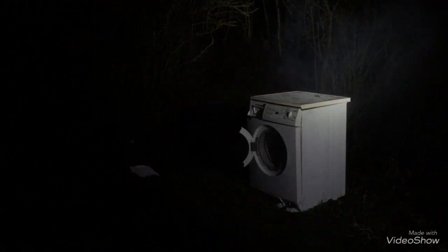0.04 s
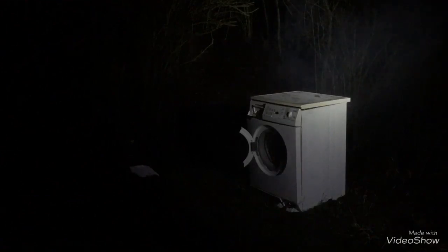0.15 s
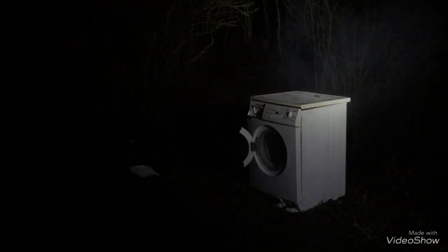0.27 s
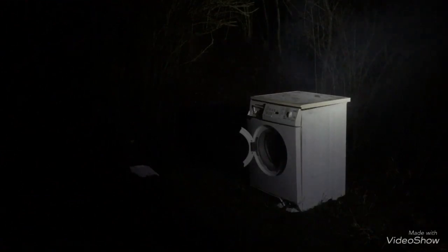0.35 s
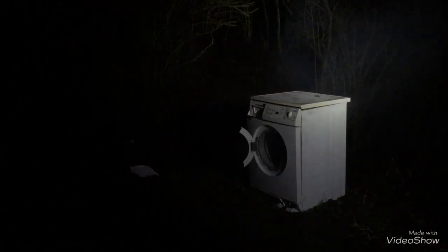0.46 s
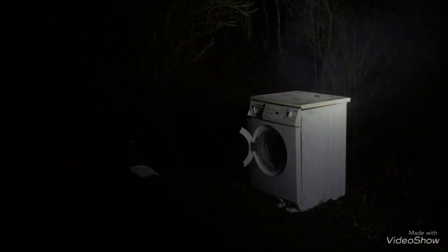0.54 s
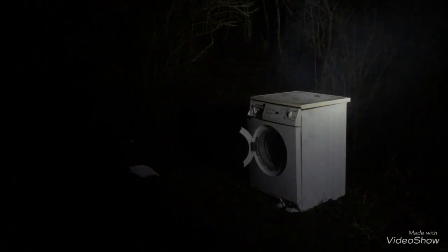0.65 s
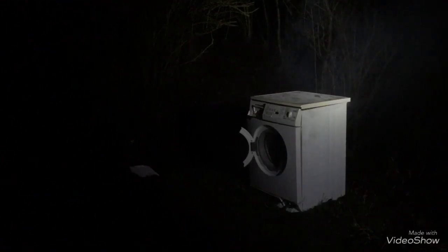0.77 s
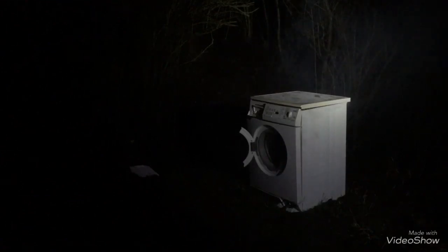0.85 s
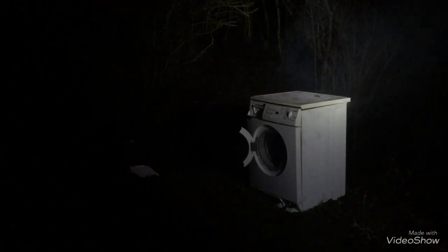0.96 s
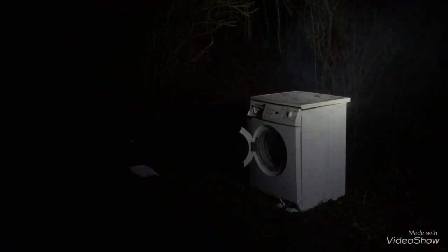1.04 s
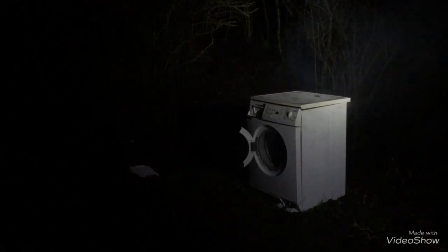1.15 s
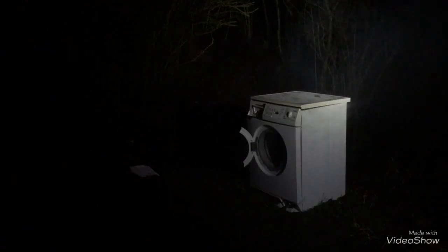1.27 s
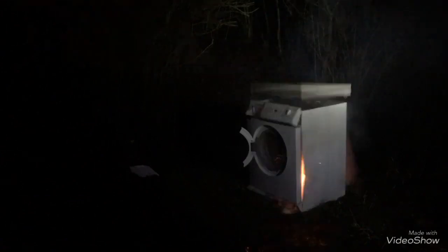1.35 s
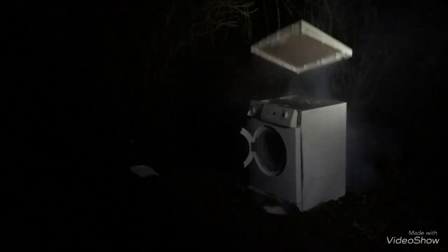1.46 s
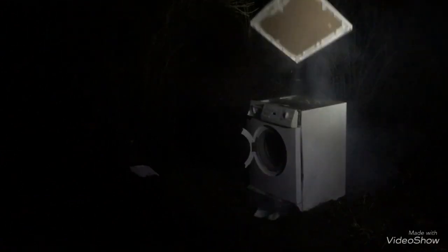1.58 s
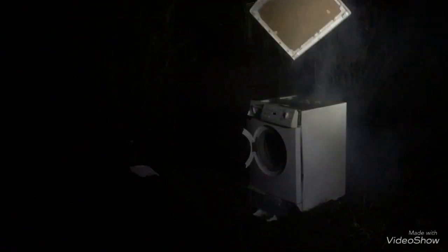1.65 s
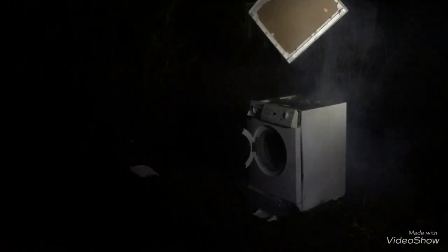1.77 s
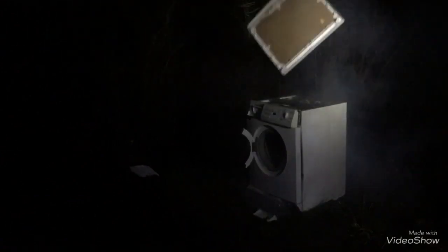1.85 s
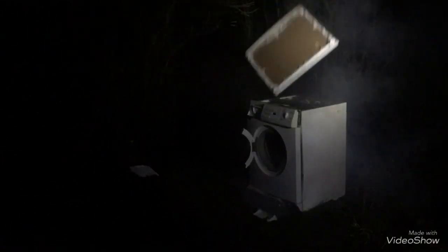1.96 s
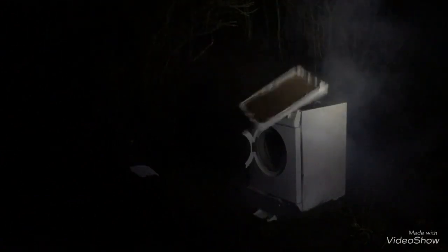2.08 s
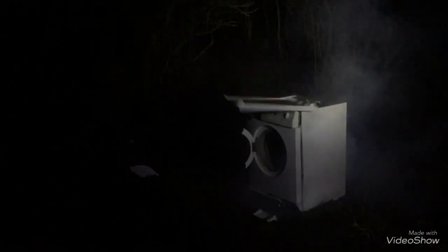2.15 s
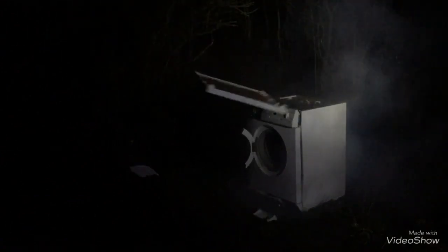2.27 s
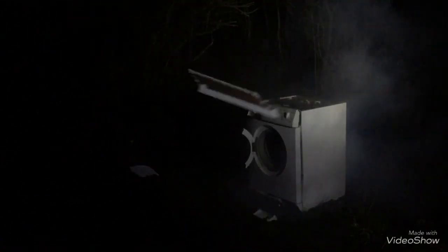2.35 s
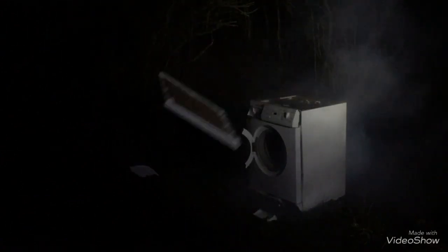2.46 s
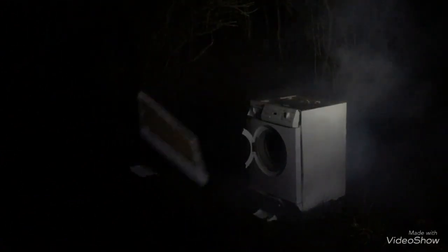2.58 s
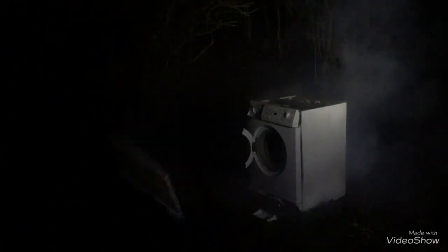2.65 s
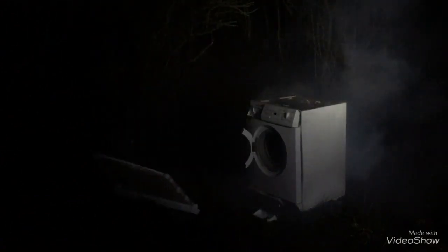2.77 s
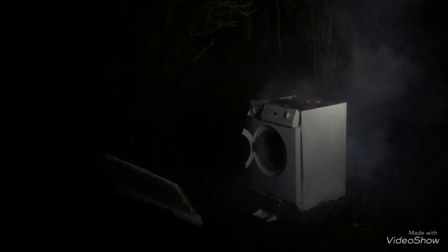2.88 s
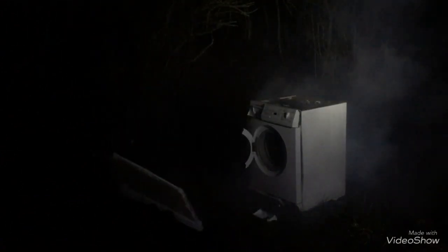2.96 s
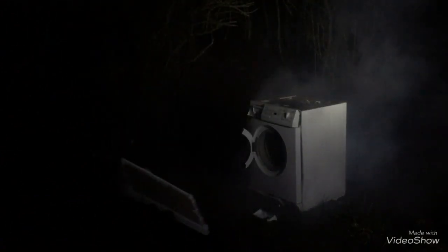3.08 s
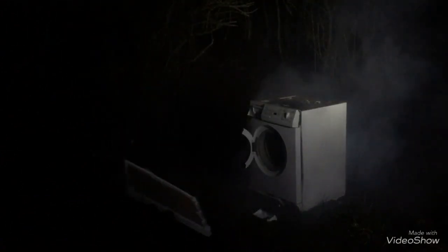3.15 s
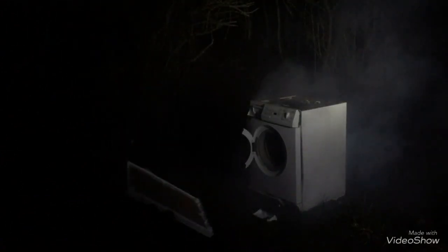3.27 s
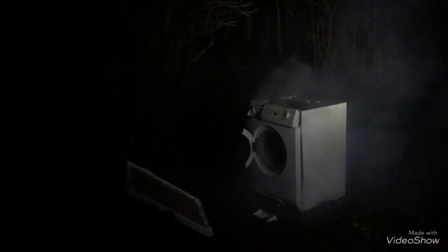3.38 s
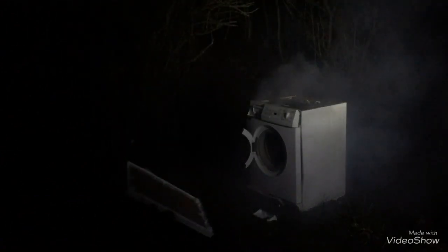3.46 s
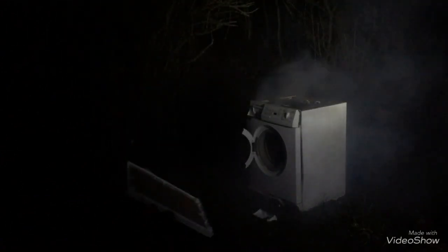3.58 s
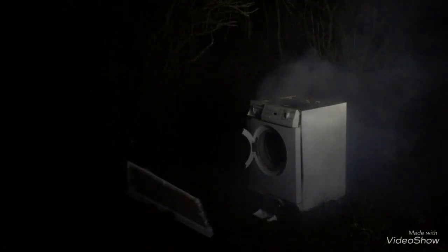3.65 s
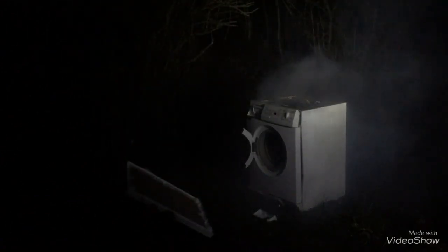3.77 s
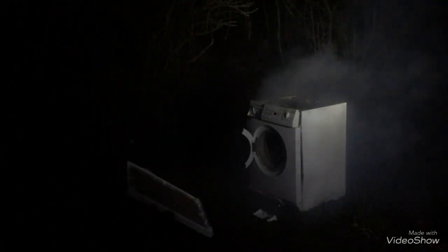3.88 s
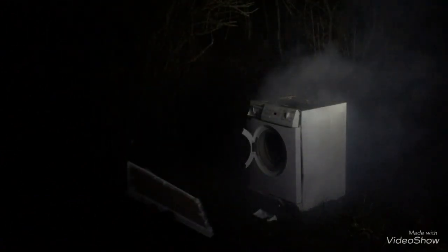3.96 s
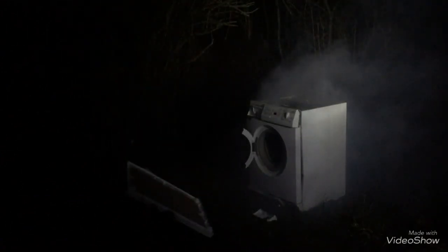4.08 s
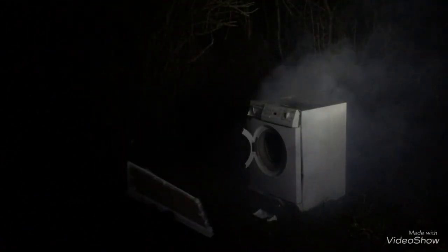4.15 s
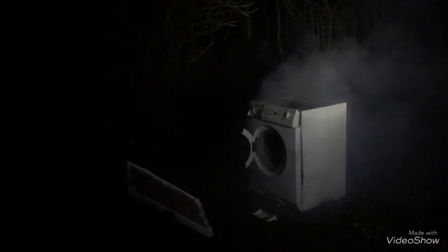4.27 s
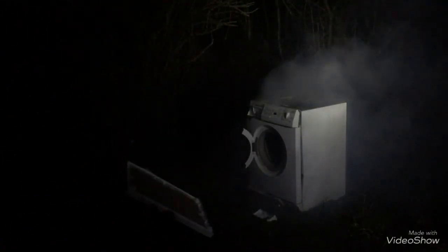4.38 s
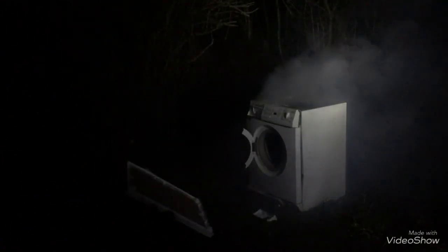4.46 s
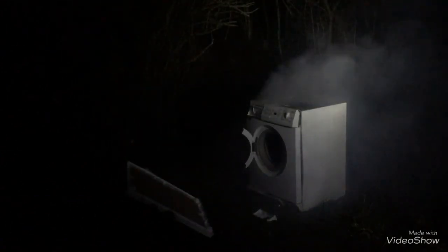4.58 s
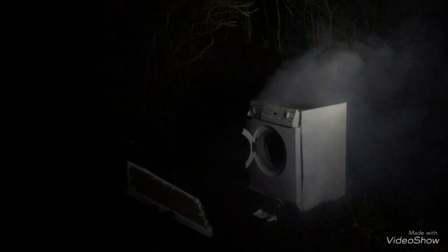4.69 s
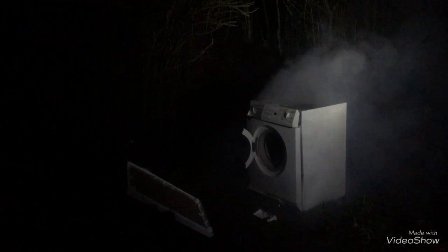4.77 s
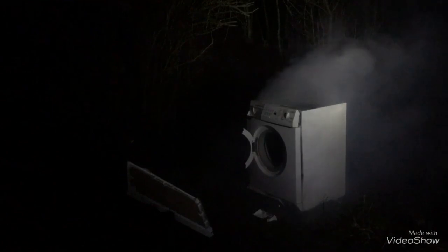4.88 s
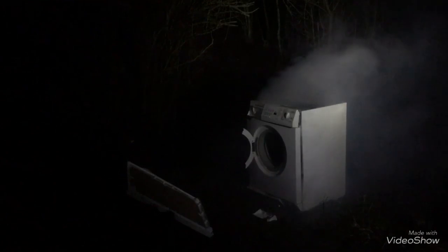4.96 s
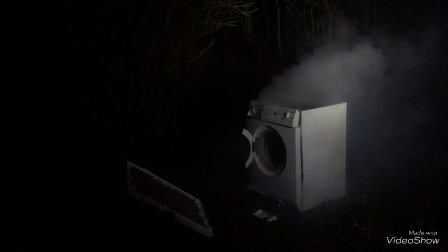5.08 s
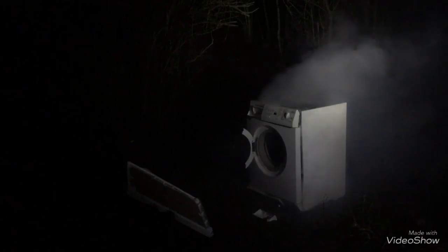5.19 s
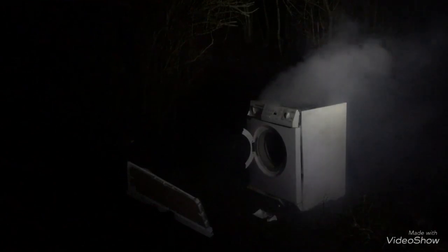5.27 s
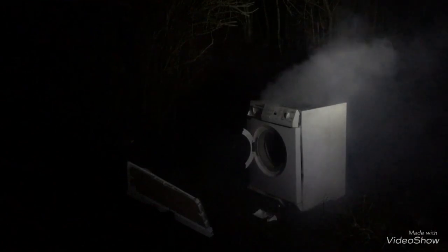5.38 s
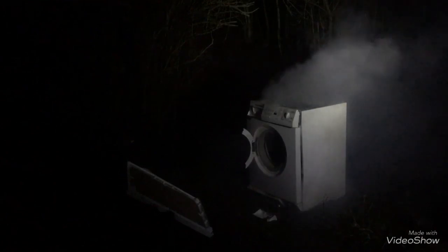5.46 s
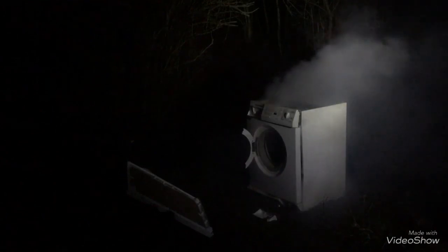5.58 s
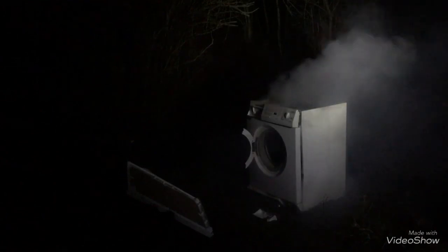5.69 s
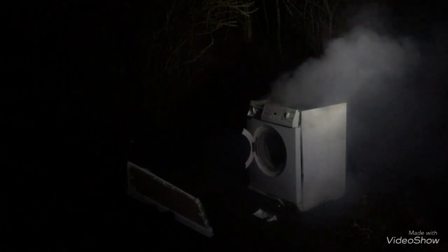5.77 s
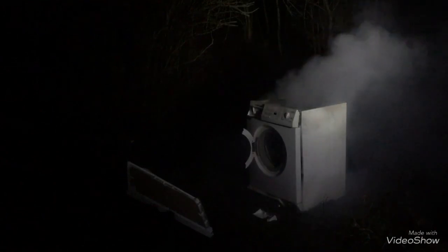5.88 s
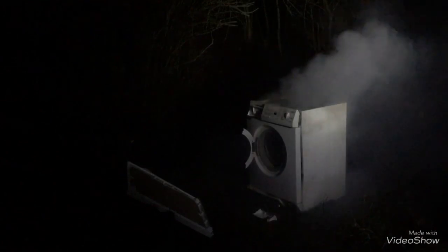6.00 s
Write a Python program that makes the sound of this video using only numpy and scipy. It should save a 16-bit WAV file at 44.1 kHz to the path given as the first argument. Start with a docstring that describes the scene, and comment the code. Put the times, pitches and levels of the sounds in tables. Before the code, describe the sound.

Quiet night air, then a sharp metallic bang with a boom and woodland echo, a thrown steel panel crashing down, and later a far rumbling firework.

```python
"""A firecracker goes off inside a washing machine at the edge of a wood at night: noise bursts make the
slams, fading sine waves the boom, and a noise surge the gas jet. A fuse-like noise fizz comes first.
The thrown top panel clatters on the cabinet and the ground, walls hum, and ticks, knocks and thuds sound.
The wood echoes blast and clatter. Later a far firework thumps and rolls over the land as fading noise.
Faint rustling and night air, both filtered noise, lie underneath."""
import sys
import numpy as np
from scipy import signal
from scipy.io import wavfile

SR = 44100
rng = np.random.default_rng(int(sys.argv[2]) if len(sys.argv) > 2 else 0)


def log_audio(samples):
    """Write samples as a 16-bit WAV file to the path given in sys.argv[1]."""
    # one column per channel
    frames = np.atleast_2d(samples).T
    # limit to full scale, then quantise
    limited = np.clip(frames, -1, 1)
    pcm = np.round(limited * 32767).astype(np.int16)
    wavfile.write(sys.argv[1], SR, pcm)


N = 266055
TIME = np.arange(N) / SR
# Noise is split into 26 bands, evenly spaced in pitch
EDGES = np.geomspace(22, 17000, 27)
CENTRES = np.sqrt(EDGES[1:] * EDGES[:-1])

# In the tables, t60_s is the time to fade by 60 dB; for noise bursts it holds at 2000 Hz.
# Noise colours only set a balance: each is scaled to total power 1, or its echo is scaled as a whole.

# Night air, balance of the noise: pitch_hz, level_db (per Hz)
NIGHT_COLOUR = [(12, -43), (20, -19.5), (59, 6), (107, -8), (137, -9.5), (496, -17.5), (603, -11),
                (942, -20), (1280, -23), (2370, -29), (2650, -44), (3310, -36.5), (4760, -40.5),
                (13000, -43), (15800, -57.5)]
NIGHT_DB = -60

# Rustling bouts in dry undergrowth: start_s, length_s, level_db
RUSTLES = [(-.07, 0.061, -62.5), (0.632, 0.058, -72.5), (2.566, 0.74, -63), (3.614, 0.42, -63),
           (4.046, 0.46, -74), (5.626, 0.12, -64), (5.965, .1, -59)]
# Balance of the leaf noise: pitch_hz, level_db (per Hz)
RUSTLE_COLOUR = [(50, -21.5), (500, 6.5), (1500, 3.5), (3000, -4.5), (6000, -13.5), (16000, -19.5)]
RUSTLE_ATTACK_S, RUSTLE_FALL_DB_PER_S = 0.052, 61.5

FAR_BANG_S = 4.509
# Firework sound coming back from ever more distant land:
# delay_s, level_db, rise_db_per_s, fall_db_per_s
LAND_RETURNS = [(.07, -40, 26, 112), (.42, -45, 14, 34), (1.15, -55, 1, 20.5)]
# Balance of the rolling noise: pitch_hz, level_db (per Hz)
ROLL_COLOUR = [(24, -25.5), (40, -9.5), (90, -5), (213, -19), (335, -8), (446, -12), (1130, -10.5),
               (1270, -10), (2540, -17), (4200, -30), (7630, -53.5), (12000, -81), (15600, -88),
               (22000, -120)]
# Balance of the first low rumble: pitch_hz, level_db (per Hz)
RUMBLE_COLOUR = [(25, -4), (85, 11.5), (280, 4.5), (600, -39.0), (2000, -33), (16000, -82)]
# Ringing tones of the far bang: pitch_hz, level_db, t60_s
FAR_TONES = [(40.8, -40, 0.37), (84, -29, 0.28), (174.5, -34, 0.4), (328.6, -43, 0.38)]
# Single reports within the roll: start_s, level_db
FAR_REPORTS = [(4.508, -42.5), (4.534, -45), (4.562, -42.5), (4.717, -41.5), (4.784, -39), (4.925, -38)]
# Brightness at the far bang in dB per octave, and how much of it each second of delay takes away
REPORT_T60_S, REPORT_TILT_DB, REPORT_DULLING_DB_PER_S = 0.093, 6.5, 21
# Deep thumps from far off: start_s, level_db
FAR_THUMPS = [(4.843, -38), (5.234, -43.5), (5.944, -47.5)]
THUMP_HZ, THUMP_T60_S = 80.1, 0.085

# Answers of the ground, the first trunks and the depth of the wood:
# delay_s, level_db (relative), rise_db_per_s, fall_db_per_s
WOOD_RETURNS = [(.015, -2.5, 1500, 135), (.23, -2.5, 331, 74.5), (.4, -20, 60, 27.5)]
# Balance of the echo: pitch_hz, level_db (relative)
WOODS_COLOUR = [(22, -18), (50, -5.5), (92, 5), (170, -8.5), (500, -8.5), (950, -5.5), (1400, 2),
                (3000, -2.5), (6000, -10.5), (15000, -23.5)]
WOODS_LENGTH_S = 1.5
# The ground slope throws the low boom back in one piece
SLOPE_DELAY_S, SLOPE_DB, SLOPE_CUT_HZ = .226, -24, 120

# Small crackling ticks close by: start_s, level_db, t60_s
TICKS = [(1.272, -60.5, .03), (1.741, -47.5, 0.066), (1.7589, -40.5, 0.11), (1.956, -58, .17),
         (2.066, -63, .14), (2.081, -56, 0.16), (2.991, -51, 0.13), (3.0677, -48, 0.028),
         (3.159, -52.5, 0.074), (3.1787, -53, 0.15), (4.182, -61, 0.0302), (5.2308, -59.5, 0.19),
         (5.314, -61.5, 0.23)]
# Balance of the tick noise: pitch_hz, level_db (per Hz)
TICK_COLOUR = [(25, -66), (200, -26), (900, -6), (1800, -1), (3000, -4), (6000, -8.5), (10000, -11.5),
               (16000, -22.5)]
# Light hard knocks: start_s, level_db, pitch_hz
KNOCKS = [(3.068, -57, 1725), (3.160, -50.5, 1620), (3.192, -54, 1930), (3.263, -50, 1877),
          (4.247, -61.5, 1500), (4.2565, -54.5, 1390)]
KNOCK_T60_S = 0.067
# Soft thuds, perhaps steps or handling: start_s, level_db, pitch_hz, t60_s
THUDS = [(.277, -55.5, 515, 0.1), (.447, -48.5, 427, 0.12), (2.884, -44, 550, 0.027),
         (3.111, -36.5, 410, .04), (3.115, -35.5, 140, 0.055), (3.152, -56, 421, 0.36),
         (3.732, -47, 665, 0.15), (5.096, -42.5, 664, 0.06), (5.545, -34.5, 270, 0.08),
         (5.657, -50.5, 318, 0.41), (5.79, -42, 645, 0.067), (5.989, -56, 894, 0.27)]
# Each thud settles with a softer, lower second touch (pitch is a ratio)
SETTLE_S, SETTLE_DB, SETTLE_PITCH = 0.026, -9.5, 0.81

# Side walls set humming: start_s, level_db, brightness_db_per_octave, t60_s
WALL_BLOWS = [(1.481, -41.5, -5.5, 1), (2.223, -45, 2, 0.47), (2.29, -46, 3, 0.47)]
# Clearest tones of the walls: pitch_hz, level_db (relative to the blow), t60_s
WALL_TONES = [(78, -6, 1.6), (95.6, -4, 2.1), (119.4, -8, 2.3), (231, -11.5, 1.2), (250, -11.5, 1.6),
              (680, -22.5, .55), (850, -22.5, 0.45), (1160, -26.5, 1.2)]
# Balance of the wall noise: pitch_hz, level_db (per Hz)
WALL_COLOUR = [(25, -46.5), (55, -15), (85, 2), (125, 0), (175, -10.5), (290, -12), (430, -14.5),
               (800, -14.5), (1400, -24), (4000, -38), (16000, -68.5)]

# The top panel hits the cabinet, then the ground:
# start_s, level_db, brightness_db_per_octave, t60_s
PANEL_HITS = [(2.194, -43.5, 1, 0.098), (2.205, -29.5, -2.5, 0.19), (2.214, -35.5, 3, 0.086),
              (2.225, -31, 4, 0.046), (2.249, -36, -2, 0.17), (2.266, -39, 2, 0.059),
              (2.281, -23, -2.5, 0.073), (2.7349, -37.5, 7, 0.15), (2.785, -27, 1, 0.036),
              (2.7953, -12.5, -0.36, 0.049)]
# Balance of the panel noise: pitch_hz, level_db (per Hz)
PANEL_COLOUR = [(25, -31), (80, -5.5), (230, -2), (450, -9.5), (700, -2), (1000, -3.5), (2000, 0.5),
                (3200, -4.5), (4300, -11.5), (6300, -17.5), (8000, -19.5), (16000, -33.5)]
# Ringing tones of the panel: pitch_hz, level_db (relative to one another), t60_s
PANEL_TONES = [(214, -8, .15), (989, 8.5, 0.02), (1140, -29, 0.18), (1255, -22.5, .06), (1497, -10, 0.077),
               (1640, -19, 0.034), (1954, -0.5, 0.072), (2293, -15.5, 0.17), (3250, 0.5, 0.051)]
# After each hit the loose trim buzzes on, far softer (level relative to the hit, tilt per octave)
BUZZ_LAG_S, BUZZ_DB, BUZZ_TILT_DB, BUZZ_T60_S = .018, -30.5, 4, .27

# Balance of the fizz: pitch_hz, level_db (per Hz)
FUSE_COLOUR = [(500, -31.5), (2000, -5), (8000, 2), (15000, -6)]
FUSE_END_S, FUSE_DB, FUSE_FALL_DB_PER_S = .44, -77, 45.5

# The charge cracks and the cabinet slams outwards:
# start_s, level_db, brightness_db_per_octave, t60_s
SLAMS = [(1.4428, -23, 6, 0.023), (1.4450, -25.5, -2, 0.027), (1.4505, -33, 8.5, 0.035),
         (1.4540, -21.5, -4.5, 0.068), (1.4568, -16.5, -2.5, 0.074), (1.4655, -16.5, 5, 0.049)]
# Balance of the sheet steel noise: pitch_hz, level_db (per Hz)
STEEL_COLOUR = [(30, -34.5), (100, -15.5), (300, -16.5), (550, -2), (750, -7.5), (980, 2), (1280, -18),
                (1800, -9), (2800, -10), (4200, -26.5), (9000, -33.5), (16000, -52.5)]
# Tones of the cabinet booming under the pressure wave: pitch_hz, level_db, t60_s
BOOM_TONES = [(50, -21.5, .14), (85.4, -14, .22), (118.4, -19, 0.23), (190.1, -19, .14), (291, -23.5, .1),
              (367, -22, .14), (543, -19.5, 0.11), (953, -20, 0.097)]
# Each tone starts 1.4 of its own cycles late, so the low ones come last
BOOM_S, BOOM_LAG_CYCLES = 1.4545, 1.4
# Balance of the gas jet noise: pitch_hz, level_db (per Hz)
JET_COLOUR = [(22, -24), (45, -15), (80, -5), (115, -8), (190, -10.5), (340, -16), (500, -21.5),
              (750, -20.5), (920, -21.5), (1270, -21.5), (1550, -20), (5390, -21), (12800, -25),
              (15800, -29.5)]
# The jet grows while the gap under the top opens, then dies as the pressure drops
JET_S, JET_OPENING_S, JET_DB = 1.4648, 0.042, -18.5
JET_RISE_DB_PER_S, JET_FALL_DB_PER_S = 109, 291

CUTOFF_HZ = 15950


def from_db(db):
    """Turn decibels into a gain."""
    return 10 ** (np.asarray(db) / 20)


def at_hz(points, hz):
    """Read a colour table at any pitch, with pitch spaced as we hear it."""
    table_hz, db = np.transpose(points)
    return np.interp(np.log(hz), np.log(table_hz), db)


def noise_bands():
    """Make one row of noise per band, all equally strong; neighbours are unrelated."""
    white = rng.standard_normal((2, N))
    rows = []
    for k in range(len(CENTRES)):
        band_filter = signal.butter(2, EDGES[k:k + 2], "band", fs=SR, output="sos")
        rows.append(signal.sosfilt(band_filter, white[k % 2]))
    rows = np.array(rows)
    return rows / rows.std(axis=1, keepdims=True)


def shares(colour, tilt_db=0):
    """Give each band its share of a total power of 1, tilted by some dB per octave."""
    level_db = at_hz(colour, CENTRES) + tilt_db * np.log2(CENTRES)
    gain = from_db(level_db) * np.sqrt(np.diff(EDGES))  # wider bands hold more power
    return gain / np.linalg.norm(gain)


def flutter(rate, depth_db):
    """Make a gain that wanders at random, with a new target `rate` times a second."""
    knots = np.arange(0, TIME[-1] + 1, 1 / rate)
    return from_db(depth_db * np.interp(TIME, knots, rng.standard_normal(len(knots))))


def surge(age, peak_s, rise_db_per_s, fall_db_per_s):
    """Make a gain that sets in at age 0, grows to 1 at peak_s and dies away."""
    late = age - peak_s
    return (age >= 0) * from_db(np.minimum(rise_db_per_s * late, -fall_db_per_s * late))


def release(s, fall_db_per_s):
    """Make a gain that holds until time s and then fades."""
    return from_db(-fall_db_per_s * np.maximum(TIME - s, 0))


def returns(rows, age):
    """Shape scattered sound: each reflecting region sends back one surge, and their powers add."""
    power = 0
    for delay, db, rise, fall in rows:
        power = power + (from_db(db) * surge(age, delay, rise, fall)) ** 2
    return np.sqrt(power)


def add(out, s, sound):
    """Mix a sound in at time s."""
    start = int(s * SR)
    out[start:start + len(sound)] += sound[:N - start]


def ring(hz, db, t60):
    """Make one fading sine wave, like a single ringing tone of an object."""
    t = TIME[:int(1.5 * t60 * SR)]
    return from_db(db - 60 * t / t60) * np.sin(2 * np.pi * hz * t)


def impacts(rows, colour, bands, low_linger):
    """Each blow wakes a dense crowd of tones, heard as noise; low ones build slower and last longer."""
    out = np.zeros(N)
    for s, db, tilt_db, t60 in rows:
        crowd = bands[:, int(s * SR):int((s + 2 * t60) * SR)]
        t = TIME[:crowd.shape[1]]
        band_t60 = t60 * (CENTRES[:, None] / 2000) ** -low_linger
        build_up = np.minimum(2 * t * CENTRES[:, None], 1)  # half a cycle long
        envelope = from_db(-60 * t / band_t60) * build_up
        add(out, s, from_db(db) * shares(colour, tilt_db) @ (crowd * envelope))
    return out


def bumps(rows, bands, above_db, below_db, tone_db):
    """A damped contact gives one short ringing tone and a puff of noise around its pitch."""
    out = np.zeros(N)
    for s, db, hz, t60 in rows:
        puff_colour = [(hz / 64, -10 * below_db), (hz / 2, -below_db), (hz, 0),
                       (hz * 2, -above_db / 3), (hz * 4, -above_db), (hz * 64, -5 * above_db)]
        out += impacts([(s, db, 0, t60)], puff_colour, bands, low_linger=0.081)
        add(out, s, ring(hz, db + tone_db, t60 / 2))
    return out


def night_air(bands):
    """Soft steady noise with a slightly wandering level stands for the night air."""
    return from_db(NIGHT_DB) * (shares(NIGHT_COLOUR) @ bands) * flutter(rate=26, depth_db=3.33)


def undergrowth(bands):
    """Dry leaves stir in bouts of uneven noise that swell, hold and fade."""
    stir = np.zeros(N)
    for s, length, db in RUSTLES:
        swell = np.clip((TIME - s) / RUSTLE_ATTACK_S, 0, 1)
        stir += from_db(db) * swell * release(s + length, RUSTLE_FALL_DB_PER_S)
    return stir * (shares(RUSTLE_COLOUR) @ bands) * flutter(rate=130, depth_db=3.0)


def far_firework(bands, dulling_db=1.98, first_tilt_db=-0.34):
    """A low thump, then lumpy rolling echoes that grow duller as their paths lengthen."""
    since_bang = TIME - FAR_BANG_S
    dullness = np.clip(since_bang, 0, 1)  # full after one second
    patchy = bands * np.array([flutter(rate=45, depth_db=2) for _ in CENTRES])
    near = shares(ROLL_COLOUR, first_tilt_db) @ patchy
    far = shares(ROLL_COLOUR, first_tilt_db - dulling_db) @ patchy
    roll_gain = returns(LAND_RETURNS, since_bang) * flutter(rate=330, depth_db=1.44)
    out = roll_gain * ((1 - dullness) * near + dullness * far)

    out += impacts([(FAR_BANG_S, -37, 0, .42)], RUMBLE_COLOUR, bands, low_linger=0.079)
    reports = []
    for s, db in FAR_REPORTS:
        tilt_db = REPORT_TILT_DB - REPORT_DULLING_DB_PER_S * (s - FAR_BANG_S)
        reports.append((s, db, tilt_db, REPORT_T60_S))
    out += impacts(reports, ROLL_COLOUR, bands[:, ::-1], low_linger=0.089)

    for hz, db, t60 in FAR_TONES:
        add(out, FAR_BANG_S, ring(hz, db, t60))
    thumps = [(s, db, THUMP_HZ, THUMP_T60_S) for s, db in FAR_THUMPS]
    return out + bumps(thumps, bands, above_db=33.5, below_db=0.0, tone_db=9)


def woods(x, bands, wet_db=-21):
    """Ground and trunks scatter sound back as a noise-like echo; the slope adds a dull slap."""
    t = TIME[:int(WOODS_LENGTH_S * SR)]
    envelope = returns(WOOD_RETURNS, t)
    gains = from_db(at_hz(WOODS_COLOUR, CENTRES)) * np.sqrt(2 * np.diff(EDGES) / SR)
    response = (gains @ bands[:, :len(t)]) * envelope / np.linalg.norm(envelope)
    out = from_db(wet_db) * signal.fftconvolve(x, response)[:N]

    slope_filter = signal.butter(4, SLOPE_CUT_HZ, fs=SR, output="sos")
    add(out, SLOPE_DELAY_S, from_db(SLOPE_DB) * signal.sosfilt(slope_filter, x))
    return out


def ticks_and_thuds(bands):
    """Crackling noise ticks, light hard knocks and soft thuds, perhaps steps or handling."""
    tick_rows = [(s, db, 0, t60) for s, db, t60 in TICKS]
    ticks = impacts(tick_rows, TICK_COLOUR, bands, low_linger=0.2) * flutter(rate=370, depth_db=5.0)
    knock_rows = [(s, db, hz, KNOCK_T60_S) for s, db, hz in KNOCKS]
    knocks = bumps(knock_rows, bands, above_db=31, below_db=1, tone_db=8)
    settles = [(s + SETTLE_S, db + SETTLE_DB, hz * SETTLE_PITCH, t60) for s, db, hz, t60 in THUDS]
    thuds = bumps(THUDS + settles, bands, above_db=25.5, below_db=-1, tone_db=1)
    return ticks + knocks + thuds


def walls(bands):
    """The thin side walls keep humming after a blow, their close tones beating."""
    out = impacts(WALL_BLOWS, WALL_COLOUR, bands, low_linger=0.38)
    for s, db, _, _ in WALL_BLOWS:
        for hz, tone_db, t60 in WALL_TONES:
            add(out, s, ring(hz, db + tone_db, t60))
    return out


def panel(bands, tones_db=-12.0):
    """The loose top rattles as it strikes, each blow with its own mix of ringing tones."""
    buzzes = [(s + BUZZ_LAG_S, db + BUZZ_DB, BUZZ_TILT_DB, BUZZ_T60_S) for s, db, _, _ in PANEL_HITS]
    out = impacts(PANEL_HITS + buzzes, PANEL_COLOUR, bands, low_linger=0.092)
    out *= flutter(rate=200, depth_db=2.5)
    for s, db, _, _ in PANEL_HITS:
        for hz, tone_db, t60 in PANEL_TONES:
            direction = rng.choice([-1, 1])  # the wave starts up or down
            level_db = db + tone_db + tones_db + rng.normal(0, 1.0)
            add(out, s, direction * ring(hz, level_db, t60))
    return out


def fuse(bands):
    """A thin, even noise fizz, likely the fuse, starts to fade about a second before the bang."""
    return from_db(FUSE_DB) * release(FUSE_END_S, FUSE_FALL_DB_PER_S) * (shares(FUSE_COLOUR) @ bands)


def blast(bands):
    """The steel slams, the cabinet booms, and turbulent gas rushes out of the gap."""
    out = impacts(SLAMS, STEEL_COLOUR, bands, low_linger=0.056)
    for hz, db, t60 in BOOM_TONES:
        add(out, BOOM_S + BOOM_LAG_CYCLES / hz, ring(hz, db, t60))
    jet_shape = surge(TIME - JET_S, JET_OPENING_S, JET_RISE_DB_PER_S, JET_FALL_DB_PER_S)
    jet_noise = shares(JET_COLOUR) @ bands[:, ::-1]  # reversed noise, unlike that of the slams
    return out + from_db(JET_DB) * jet_shape * jet_noise


def scene(blast_echo_db=1, clatter_echo_db=-7):
    """The blast carries far into the wood, sounds near the ground less so; night air lies under all."""
    bands, air, trees = noise_bands(), noise_bands(), noise_bands()
    background = night_air(air) + undergrowth(air[:, ::-1]) + far_firework(trees)
    clatter = panel(bands) + walls(bands) + ticks_and_thuds(bands)
    bang = blast(bands)
    echo = woods(from_db(blast_echo_db) * bang + from_db(clatter_echo_db) * clatter, trees)
    return (background + echo + clatter + fuse(bands) + bang)[None]


def record(dry, low_cut_hz=32):
    """The microphone drops the deepest bass, rounds the loudest peaks and cuts the top."""
    ceiling = .7
    low_cut = signal.butter(2, low_cut_hz, "high", fs=SR, output="sos")
    thin = signal.sosfilt(low_cut, dry)
    rounded = ceiling * np.tanh(thin / ceiling)
    top_cut = signal.ellip(12, .1, 70, CUTOFF_HZ, fs=SR, output="sos")
    return signal.sosfilt(top_cut, rounded)


dry = scene()
out = record(dry)
log_audio(out)
```